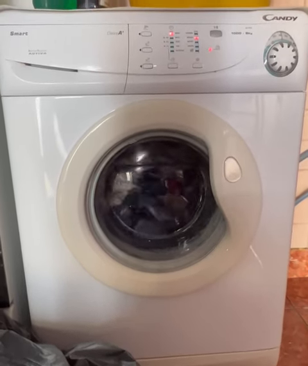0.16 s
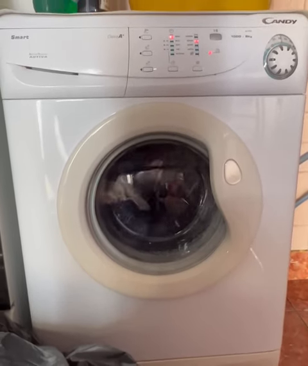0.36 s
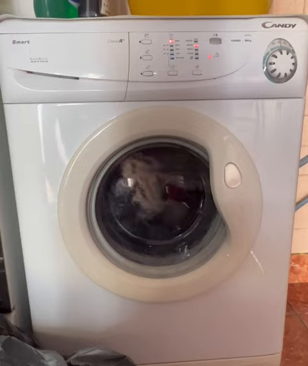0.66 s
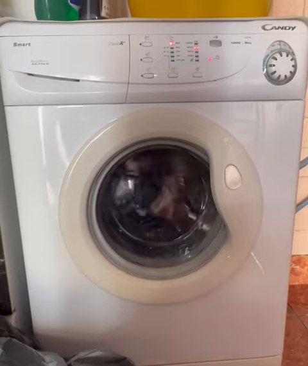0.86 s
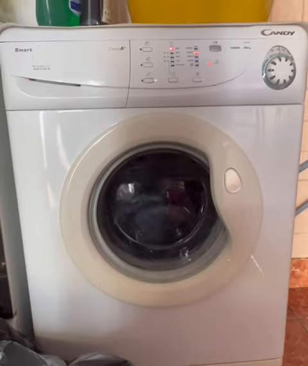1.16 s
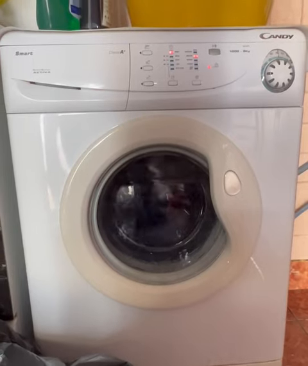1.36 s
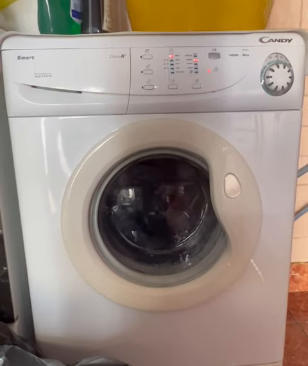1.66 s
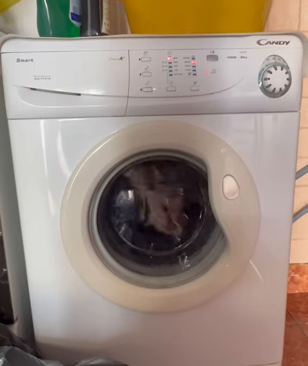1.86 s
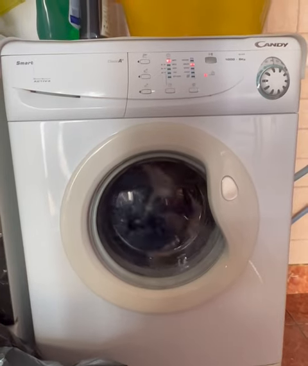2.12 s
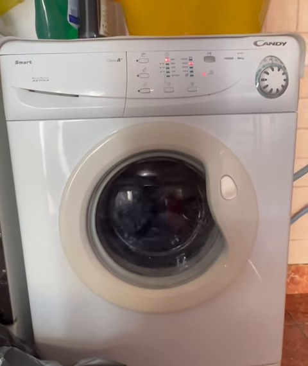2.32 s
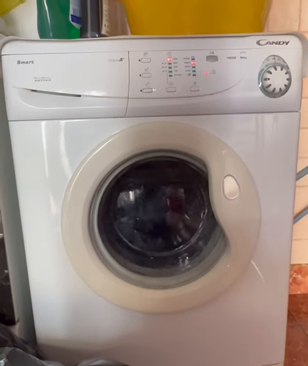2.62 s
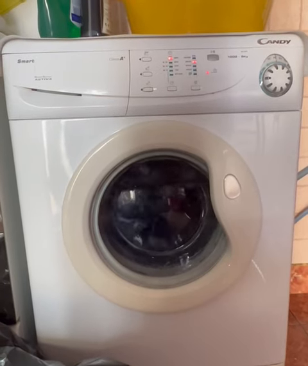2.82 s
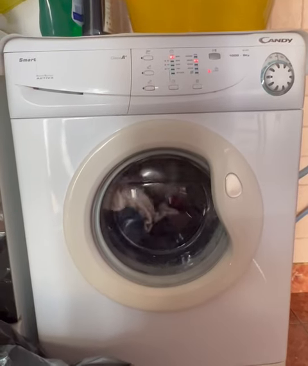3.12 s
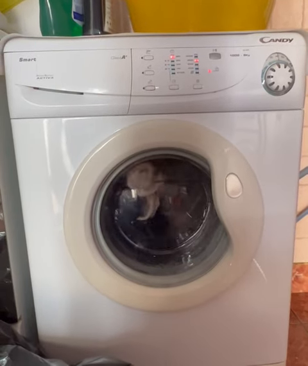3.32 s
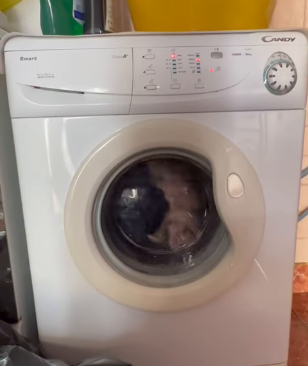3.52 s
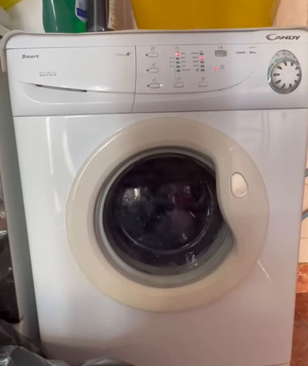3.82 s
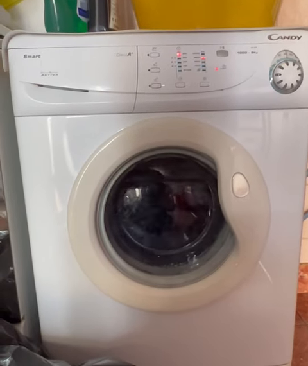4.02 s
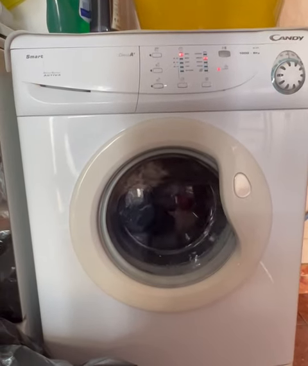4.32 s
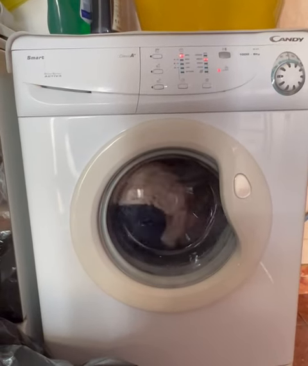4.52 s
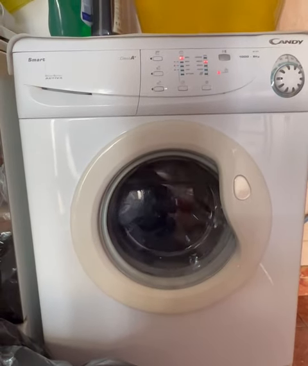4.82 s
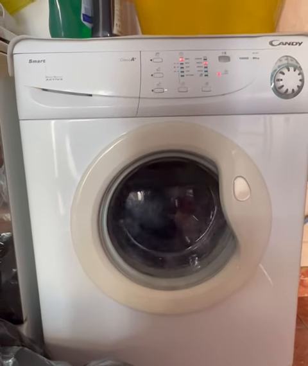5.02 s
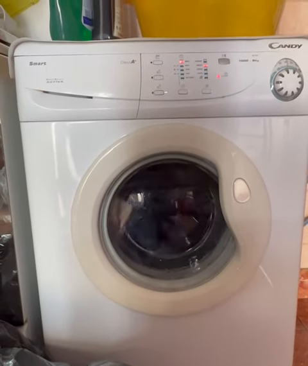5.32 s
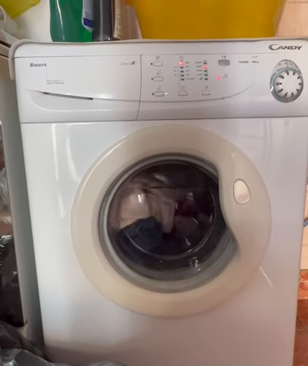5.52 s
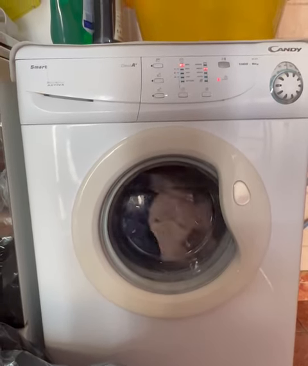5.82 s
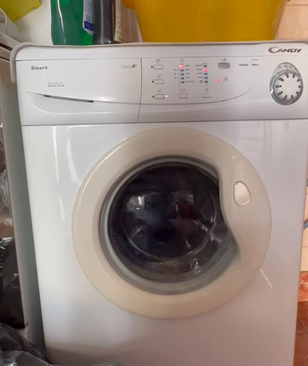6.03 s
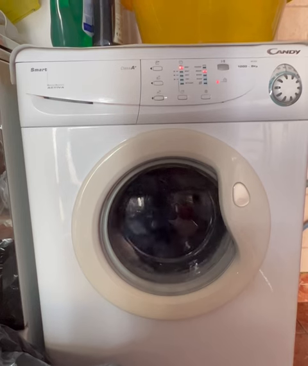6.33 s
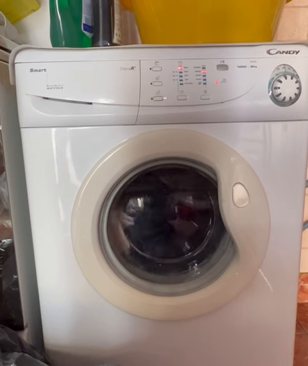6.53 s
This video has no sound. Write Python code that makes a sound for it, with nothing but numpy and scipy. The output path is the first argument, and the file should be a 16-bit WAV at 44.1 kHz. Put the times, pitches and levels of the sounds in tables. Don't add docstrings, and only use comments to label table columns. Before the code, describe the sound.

Close low motor hum with uneven tumbling of wet clothes, dull thumps and watery swishes in a small tiled room, motor cutting off at the end.

```python
import sys
import numpy as np
from scipy import signal
from scipy.fft import rfft, irfft, next_fast_len
from scipy.io import wavfile
from scipy.ndimage import uniform_filter1d

SR = 44100
rng = np.random.default_rng(int(sys.argv[2]) if len(sys.argv) > 2 else 0)


def wav_out(sig):
    wavfile.write(sys.argv[1], SR, np.round(np.clip(np.atleast_2d(sig).T, -1, 1) * 32767).astype(np.int16))


def field_ratio(decibels):
    return 10 ** (np.asarray(decibels, dtype=float) / 20)


N = 294147
T = np.arange(N) / SR
SLOW = T[::64]

OFF_S = 6.375
HUM_HZ = 100.03

# multiple, level_db, share of the core rattle followed
HIGH_HUM = [(4, -67, .2), (6, -65.5, .1), (7, -60, 1.05), (8, -64.5, .15), (20, -68.5, .05)]
# time_s, change_db
CORE_RATTLE = [(0, 3), (.2, -2), (.55, 5), (.8, -5), (1.42, -7), (1.65, 2), (2.05, 1), (2.45, -6), (2.7, 2),
               (3.0, -2), (3.42, 1), (3.92, -6), (4.17, 2), (4.92, -6), (5.17, 4), (5.42, -5), (5.6, 2),
               (6.08, -8)]
# time_s, current_db (as hum), chop_db (third multiple over first)
MOTOR_LOAD = [(0.0, -47, -4), (0.28, -42.5, -7.5), (1.45, -47, -2.5), (1.54, -44, -11.5), (2.11, -45, -3.5),
              (2.16, -51, 1), (2.73, -42, -8), (2.91, -52, 4.5), (2.99, -42, -5), (3.88, -48, -4),
              (4.06, -50, 5.5), (4.14, -44, -8), (4.57, -46, -1.5), (5.24, -47.5, -3.5), (5.28, -42, -13),
              (5.88, -48, 0.5), (6.08, -44, -8.5), (6.36, -46.5, -1.5)]
# current_db, chop_db
USUAL_LOAD = (-44, -4)
# start_s, change_db, length_s
SURGES = [(.12, -2.5, .05), (.42, 3, .06), (.7, 2.5, .05), (0.848, 3, .06), (1.04, 5, 0.023),
          (1.16, -3, .04), (1.33, 4.5, 0.043), (1.93, -2, .05), (2.15, -4, .04), (2.92, -4, .05),
          (2.397, 4, 0.065), (2.75, 3, .04), (3.13, -3, .04), (3.65, 1, .04), (3.75, 4.5, .03),
          (4.01, 3, .02), (4.166, 3, .04), (4.32, -4, .05), (4.538, 4, 0.035), (4.65, -5, .03),
          (4.95, 0.5, 0.045), (5.17, 4, 0.028), (5.37, 2.5, 0.036), (5.7, 2.5, 0.053), (5.98, -3, 0.018),
          (6.04, 2, .04), (6.25, -1, .06)]
SURGE_SHARES = (0.97, 0.41, 0.23)
UNLOAD_SHARES = (1.0, 0.74, 0.21)
# pitch_hz, level_db (per Hz)
MOTOR_NOISE = [(25, -30), (38, -20), (50, -12.5), (75, -3.5), (110, 1), (220, -11.5), (440, -18.5),
               (850, -17), (1100, -30.5), (2600, -29.5), (3600, -39), (5200, -41.5), (6900, -31),
               (8600, -37.5), (12000, -39)]
# pitch_hz, width_hz, level_db
WHINES = [(136, 11, -62), (322, 43, -69.5), (487.4, 44, -66.5), (662, 42, -59), (1501, 38, -77.5),
          (2001, 110, -67.5), (4406, 123, -74.5), (4585, 46, -78.5), (7200, 74, -91), (7590, 28, -77.5),
          (7740, 670, -73)]
# start_s, length_s, swish_db, thud_db, hum_change_db
DROPS = [(0.253, 0.074, -52, -49.5, -5), (0.598, 0.062, -55.5, -44.5, 1), (0.856, .03, -61, -56, -3),
         (1.004, .14, -50.5, -44.5, -6), (1.358, 0.044, -65, -59.5, -2), (1.6, .14, -59, -57, -1),
         (1.845, 0.05, -49.5, -42.5, -3), (2.0, .14, -62, -68, -2), (2.193, 0.079, -46, -42.5, -4),
         (2.67, 0.073, -60, -52.5, -0.5), (2.929, 0.17, -57, -48, 0), (3.3, .08, -66, -60, -1),
         (3.623, 0.063, -50, -44, -1), (3.873, 0.054, -61, -55, 1), (4.03, 0.082, -52, -46, 0),
         (4.424, .07, -55, -45.5, 4), (4.712, 0.084, -49, -42.5, 3.5), (5.0, 0.044, -66, -60, 1),
         (5.239, 0.073, -45, -43.5, 4), (5.49, 0.034, -61, -54, -1), (5.584, 0.029, -55.5, -51.5, 0),
         (5.867, 0.1, -50, -47.5, 2), (6.311, 0.09, -48.5, -47.5, 1), (6.429, .1, -55, -47, 0)]
# floor_db, rise_db_per_s, sag_db, release_db_per_s
SWISH_RULE = (-66.5, 508, -3.5, 142)
# floor_db, rise_db_per_s, sag_db, release_db_per_s
THUD_RULE = (-64, 403, 0, 126)
# pitch_hz, level_db (per Hz)
SWISH_COLOUR = [(350, -27.5), (600, 1), (742, -5.5), (954, -1), (1720, -11.5), (2210, -18.5), (4510, -27.5),
                (5050, -33.5), (7550, -26.5), (12000, -56), (15600, -75), (22000, -120)]
# pitch_hz, level_db (per Hz)
THUD_COLOUR = [(30, -45), (50, -1), (75, -6), (130, 0.5), (260, 2), (400, -3.5), (600, -7), (900, -14),
               (1400, -47)]
# pitch_hz, width_hz, level_db
DRUM_PATCHES = [(267.3, 22, -2), (347, 29, -3.5), (485, 23, -4.5), (578, 76, -2.5), (940, 79, -9.5),
                (1100, 47, -6.5), (1435, 260, -13), (1620, 77, -10), (2300, 68, -15.5), (2730, 100, -21)]
# start_s, peak_db, drum_pitch_hz, brightness_db
SLAPS = [(.2395, -42.5, 820, 2), (.264, -43, 880, 4.5), (.6135, -32, 700, -11), (.6494, -39, 851, -3),
         (.8759, -43.5, 970, -4.5), (1.0012, -39, 580, -3), (1.0496, -41.5, 930, 3),
         (1.8557, -36.5, 830, 0.8), (2.2, -37, 1580, 4.5), (2.2294, -39, 931, 3.5), (2.926, -47, 880, 5),
         (3.0498, -38.5, 850, -4), (3.0947, -35, 600, -8), (3.6328, -34.5, 950, 0.8),
         (3.6798, -44, 960, 2.2), (4.0155, -28.5, 940, .3), (4.0594, -38, 610, .3), (4.1039, -37, 1040, -1),
         (4.4515, -31, 918, -7), (4.7062, -50, 960, 2), (4.744, -36.5, 940, -4), (4.7992, -36, 1100, -9),
         (5.2323, -29, 1380, 0.3), (5.2964, -26, 1427, -1), (5.4894, -48, 830, -1.5),
         (5.5994, -42, 820, -5), (5.8683, -39, 500, .3), (6.3046, -29.5, 1640, 0.7), (6.3618, -35, 972, -5),
         (6.4435, -33, 900, -2.5)]
# start_s, peak_db, drum_pitch_hz
TAPS = [(0.5332, -48, 1910), (1.119, -46, 940), (1.562, -50, 1080), (1.7894, -51, 1440), (1.831, -55, 940),
        (2.6823, -49, 1940), (2.9694, -42, 910), (3.4388, -55, 2050), (3.81, -50, 851), (3.9804, -64, 872),
        (4.399, -55, 900), (5, -50, 1980), (5.338, -55, 1080), (5.9187, -47, 1400), (6.421, -48, 950)]
# start_s, peak_db, drum_pitch_hz, brightness_db
PATS = [(.284, -43, 2250, 4), (.32, -46, 1400, 0), (1.016, -43, 700, -1), (1.031, -42, 2300, 4),
        (1.096, -45, 2400, 1), (1.126, -46, 1200, 2), (1.34, -49, 1500, 0), (1.708, -48, 1200, 3),
        (1.864, -39, 1100, 0), (1.925, -49, 2300, 3), (2.154, -46, 1300, 0), (2.202, -39, 2500, 3),
        (2.262, -42, 1500, 2), (2.347, -53, 2500, 6), (2.728, -51, 2400, 4), (2.858, -48, 1050, -3),
        (2.904, -48, 1500, 4), (2.965, -41, 1200, -2), (3.092, -41, 1110, -5), (3.622, -48, 2200, 4),
        (3.712, -45, 1500, 2), (3.848, -49, 1400, 2), (4.024, -34, 2300, 3), (4.104, -44, 2400, 3),
        (4.477, -39, 1000, -5), (4.686, -46, 2100, 1), (4.733, -45, 2600, 5), (4.797, -36, 1300, -4),
        (5.298, -32, 1250, -2), (5.312, -41, 2400, 2), (5.345, -44, 1200, -1), (5.615, -43, 900, -2),
        (5.836, -52, 2300, 5), (5.87, -43, 1070, 1), (5.951, -41, 2300, 3), (6.307, -34, 1650, -2),
        (6.325, -38, 1100, -2), (6.385, -41, 900, -3), (6.422, -37, 960, -4), (6.438, -48, 2250, 4),
        (6.49, -39, 700, -5), (6.515, -41, 620, -5), (6.538, -40, 560, -6), (6.568, -43, 480, -7)]
# pitch_hz, level_db (per Hz)
SLAP_COLOUR = [(250, -37.5), (420, -10.5), (497, -15), (686, 3.5), (974, -9.5), (1380, -5.5), (1730, -9),
               (2330, -9), (5710, -36), (7240, -31.5), (12000, -46), (15600, -73), (22000, -120)]
# start_s, peak_db, pitch_hz
KNOCKS = [(.284, -42, 260), (.644, -40, 400), (1.0345, -33, 264), (1.085, -39, 310), (1.875, -38, 330),
          (2.2145, -33, 285), (2.2245, -36, 285), (2.283, -39, 230), (3.074, -39, 300), (3.664, -39, 300),
          (3.6843, -34, 250), (4.1137, -38, 260), (4.47, -37, 304), (4.7437, -38, 300), (4.804, -33, 304),
          (5.3146, -38, 330), (5.934, -41, 300), (6.385, -39, 120), (6.4535, -36, 130), (6.4515, -36, 410),
          (6.4925, -39, 450), (6.514, -43, 480), (6.49, -40, 110), (6.545, -42, 420), (6.57, -44, 140),
          (6.615, -46, 100)]
# pitch_hz, time_to_fall_60_db_s
TILE_RING = [(100, 0.58), (1000, 0.11), (4000, 0.29), (10000, 0.051)]
# pitch_hz, level_db (left-right difference over the shared sound)
WIDTH = [(40, -39), (97, -25), (160, -23), (250, -13.5), (410, -11.5), (660, -5.5), (1060, -8.5),
         (1500, -13.5), (1800, -20), (2100, -8.5), (2770, 0), (4470, -3), (5300, 4), (5800, -29)]
# pitch_hz, share
LEAN = [(100, -.1), (300, -0.49), (700, -0.19), (1200, -0.14), (2500, 0.14), (4500, 0.36), (8000, 0.16)]
# pitch_hz, share
LATE = [(60, 0.079), (400, 0.11), (1000, .1), (2000, 0.59), (3500, 0.49), (5000, 0.59)]
# pitch_hz, level_db
SHARED_TREBLE = [(11600, 0), (11750, -6), (12250, -7.5), (12400, -70)]
# pitch_hz, level_db (per Hz)
HISS_COLOUR = [(7300, -69), (7700, 0.5), (8800, -4), (10000, -6), (11800, 5.5), (13200, -10), (15700, 4),
               (16500, -72)]


def evened(x):
    return x / np.sqrt(np.mean(x ** 2) + 1e-20)


def noise_pair():
    return rng.standard_normal((2, N))


def after(s):
    return np.maximum(T - s, 0)


def read(points, hz):
    f, value = np.transpose(points)
    return np.interp(np.log(hz + 1), np.log(f + 1), value)


def curves(rows):
    s, *columns = np.transpose(rows)
    return [np.interp(T, s, c) for c in columns]


def bumps(s, db, length):
    bells = np.exp(-((SLOW[:, None] - s) / length) ** 2)
    return np.interp(T, SLOW, bells @ db)


def wander(hz):
    chance = uniform_filter1d(rng.standard_normal(N), size=64)[::64]
    f = np.fft.rfftfreq(len(SLOW), SLOW[1])
    slow = irfft(rfft(chance) / (1 + (f / hz) ** 4), len(SLOW))
    return evened(np.interp(T, SLOW, slow))


def colour(x, points):
    gain_db = read(points, abs(np.fft.fftfreq(4096, 1 / SR)))
    log_gain = np.log(field_ratio(np.maximum(gain_db, -100)))
    taps = np.fft.ifft(np.exp(log_gain - 1j * signal.hilbert(log_gain).imag)).real[:2048]
    taps = taps / np.linalg.norm(taps)
    return signal.oaconvolve(x, taps[None], axes=1)[:, :x.shape[1]]


def resonate(x, hz, width):
    r = np.exp(-np.pi * width / SR)
    pole = r * np.exp(2j * np.pi * hz / SR)
    return np.sqrt(2 * (1 - r ** 2)) * signal.lfilter([1], [1, -pole], x).real


def hum():
    current_db, chop_db = curves(MOTOR_LOAD)
    usual_current_db, usual_chop_db = USUAL_LOAD
    second_db = -48.5 + 0.45 * (current_db - usual_current_db) - 0.085 * (chop_db - usual_chop_db)
    start_s, *_, change_db = np.transpose(DROPS)
    unload_db = bumps(start_s + 0.039, change_db, 0.024)
    surge_db = bumps(*np.transpose(SURGES))

    levels = []
    low_db = (current_db, second_db, current_db + chop_db)
    for k, db, share, pull in zip((1, 2, 3), low_db, UNLOAD_SHARES, SURGE_SHARES):
        levels.append((k, db + share * unload_db + pull * surge_db + 1.77 * wander(4.4)))
    rattle_db = curves(CORE_RATTLE)[0]
    for k, db, share in HIGH_HUM:
        levels.append((round(k), db + share * rattle_db + 1.1 * wander(4)))

    tone = np.zeros(N)
    for k, db in levels:
        dies_db_per_s = 400 if k > 1 else 220
        lead = np.pi / 2 if k > 2 else 0
        turn = 2 * np.pi * HUM_HZ * T + 0.063 * wander(8.7)
        level = np.sqrt(2) * field_ratio(db - dies_db_per_s * after(OFF_S))
        tone += (-1) ** (k + 1) * level * np.cos(k * turn + lead)
    return np.array([tone, np.zeros(N)])


def rotor():
    whine_db = np.maximum(-150 * after(OFF_S), -32)
    dipping = np.minimum(after(OFF_S) / 0.11, 1)
    returning = np.minimum(after(6.6) / 0.023, 1)
    rotor_db = -8 * (dipping - returning)
    noise = field_ratio(-53.5 + rotor_db + 0.81 * wander(31)) * colour(noise_pair(), MOTOR_NOISE)
    for hz, width, db in WHINES:
        once = resonate(noise_pair(), hz, 1.34 * width)
        ring = evened(resonate(once, hz, 1.34 * width))
        noise += ring * field_ratio(db + (whine_db if hz < 3000 else rotor_db))
    return noise * (1 + 0.041 * np.cos(2 * np.pi * HUM_HZ * T))


def strike(blows):
    out = np.zeros((2, N + SR // 5))
    t = np.arange(SR // 5) / SR
    for s, db, hz, bright_db, rise_s, t60 in blows:
        noise = rng.standard_normal((3, len(t)))
        lumps_db = 1.9 * evened(uniform_filter1d(noise[2], size=200))
        rise = (1 - np.exp(-t / rise_s)) * (1 - 5 * t)
        burst = noise[:2] * rise * field_ratio(db - 10.5 + lumps_db - 60 * t / max(t60, .02))
        tint = [(f, level + bright_db * np.log2(f / 1500)) for f, level in SLAP_COLOUR]
        body = colour(burst, tint)
        tub_hz = 326 * (1 + 0.62 * rng.random() ** 2)
        patch = 0.55 * resonate(burst, hz, 60)
        shell = 0.33 * resonate(burst, 680, 60)
        tub = 0.41 * resonate(burst, tub_hz, 30)
        out[:, round((s - .003) * SR):][:, :len(t)] += body + patch + shell + tub
    return out[:, :N]


def slaps():
    blows = []
    for s, db, hz, bright_db in list(SLAPS) + [(*tap, -1.2) for tap in TAPS]:
        softer_db = -27.5 - db
        blows.append((s, db, hz, bright_db, .0013 + .0001 * softer_db, 0.12 + 0.0148 * softer_db))
    return strike(blows)


def pats():
    return strike([(*pat, .003, .07) for pat in PATS])


def grains(per_s, spread_db):
    size_db = spread_db * np.minimum(rng.exponential(1, (2, N)), 4)
    size = field_ratio(size_db) * rng.standard_normal((2, N))
    return evened(size * (rng.random((2, N)) < per_s / SR))


def falling(rule, levels_db):
    floor_db, rise, sag_db, release = rule
    s, length = np.transpose(DROPS)[:2]
    since = SLOW[:, None] - s
    before_db = -rise * np.maximum(-since, 0)
    during_db = sag_db * np.clip(since / length, 0, 1)
    ending_db = -release * np.maximum(since - length, 0)
    drops_db = levels_db + before_db + during_db + ending_db
    churn_db = floor_db + 1.1 * wander(3.5) - 40 * after(OFF_S)
    drops_power = np.interp(T, SLOW, (field_ratio(drops_db) ** 2).sum(axis=1))
    return 10 * np.log10(field_ratio(churn_db) ** 2 + drops_power)


def slosh():
    _, _, wet_db, heavy_db, _ = np.transpose(DROPS)
    swish_db = falling(SWISH_RULE, wet_db)
    thud_db = falling(THUD_RULE, heavy_db)
    spraying_db = wet_db + 2.5 + 0.4 * (wet_db - heavy_db)
    spray_db = falling((-54.5, *SWISH_RULE[1:]), spraying_db) - swish_db

    drops = colour(grains(2500, 2.6) * field_ratio(swish_db - 3.0 + 1.76 * wander(50)), SWISH_COLOUR)
    treble = signal.butter(2, 3000, "high", fs=SR, output="sos")
    spray = (field_ratio(spray_db) - 1) * signal.sosfilt(treble, drops)
    thud = colour(grains(1500, 0.59) * field_ratio(thud_db - 1.6 + 0.68 * wander(23)), THUD_COLOUR)

    lumps = grains(1100, 1.3)
    patch = rng.integers(0, len(DRUM_PATCHES), (2, N))
    rings = np.zeros((2, N))
    for k, (hz, width, db) in enumerate(DRUM_PATCHES):
        level_db = thud_db - 1.0 if hz < 800 else swish_db + 5.5
        rings += resonate(lumps * (patch == k) * field_ratio(db + level_db), hz, width)
    return drops + spray + thud + rings


def knocks():
    out = np.zeros(N + SR // 5)
    t = np.arange(SR // 5) / SR - .01
    for s, db, hz in KNOCKS:
        push = np.exp(-(t / .003) ** 2)
        ring = field_ratio(-60 * t * hz / 16)
        shape = np.where(t < 0, push, ring)
        out[round((s - .01) * SR):][:len(t)] -= field_ratio(db) * shape * np.cos(2 * np.pi * hz * t)
    return out[:N] * np.array([[1], [.3]])


def tiles(x):
    taps = np.zeros((2, SR // 2))
    at = np.arange(200, SR // 2 - 20, 20)
    at = at + rng.integers(0, 20, (2, len(at)))
    np.put_along_axis(taps, at, rng.choice([-1., 1.], at.shape), 1)
    hz, t, z = signal.stft(taps, SR, nperseg=256)
    fade = field_ratio(-60 * t / read(TILE_RING, hz)[:, None])
    tail = signal.istft(z * fade, SR, nperseg=256)[1]
    return signal.fftconvolve(x, tail / np.linalg.norm(tail[0]), axes=1)[:, :N]


def hiss():
    return field_ratio(-70.5) * colour(rng.standard_normal((1, N)), HISS_COLOUR)[0]


def two_ports(x):
    size = next_fast_len(N)
    shared, other = rfft(x, size, axis=1)
    hz = np.fft.rfftfreq(size, 1 / SR)
    lean = np.clip(read(LEAN, hz), -.8, .8) - 1j * np.clip(read(LATE, hz), 0, .8)
    unrelated = np.sqrt(np.maximum(1 - abs(lean) ** 2, 0))
    side = irfft(field_ratio(read(WIDTH, hz)) * (lean * shared + unrelated * other), size)[:N]
    side += hiss()
    mid = irfft(shared * field_ratio(read(SHARED_TREBLE, hz)), size)[:N]
    return np.array([mid + side, mid - side])


def scene():
    motor = hum() + rotor()
    laundry = slaps() + pats() + slosh() + knocks()
    return two_ports(motor + laundry + field_ratio(-11) * tiles(laundry))


def roll_off(x):
    return signal.sosfilt(signal.butter(12, 15720, fs=SR, output="sos"), x)


def record(dry):
    faded = dry * field_ratio(-64 * after(6.468))
    soft = .12 * np.tanh(faded / .12)
    return roll_off(soft)


dry = scene()
out = record(dry)
wav_out(out)
```